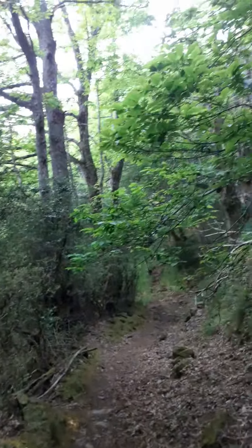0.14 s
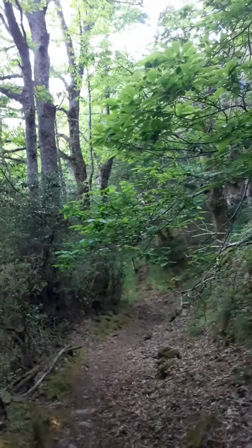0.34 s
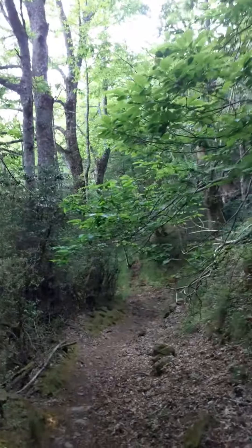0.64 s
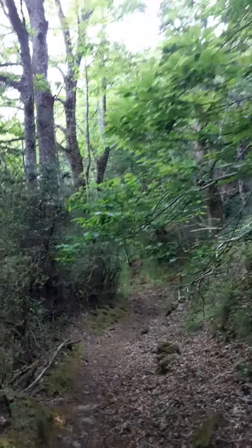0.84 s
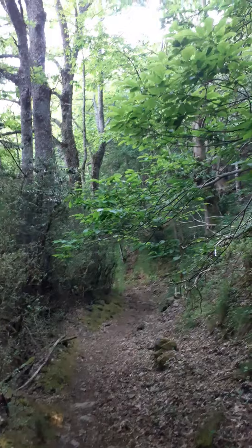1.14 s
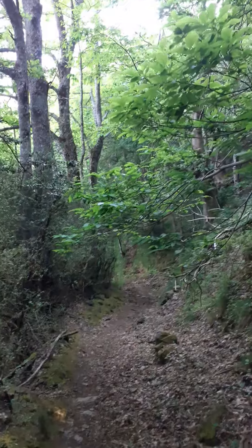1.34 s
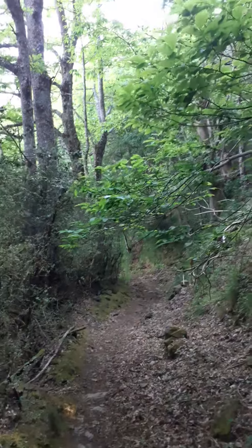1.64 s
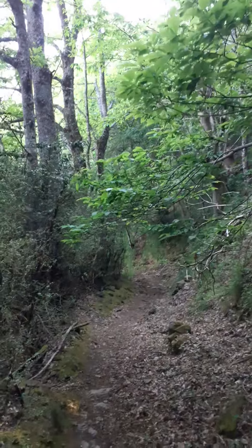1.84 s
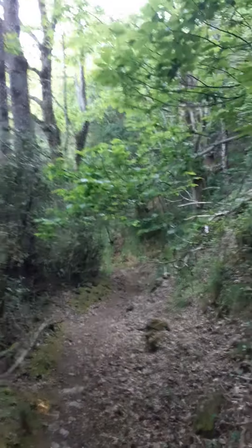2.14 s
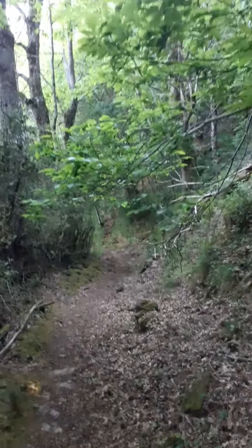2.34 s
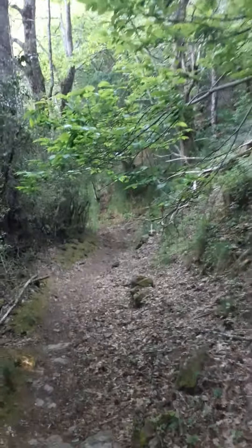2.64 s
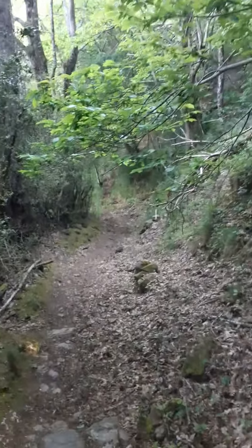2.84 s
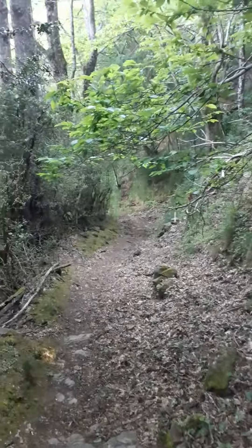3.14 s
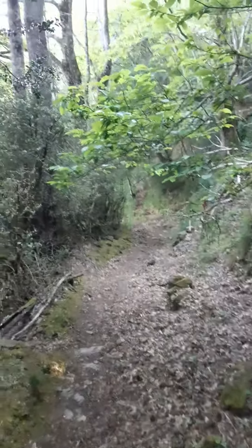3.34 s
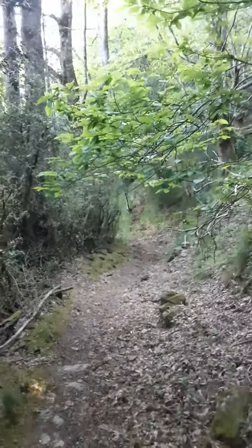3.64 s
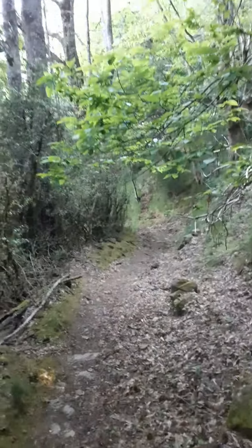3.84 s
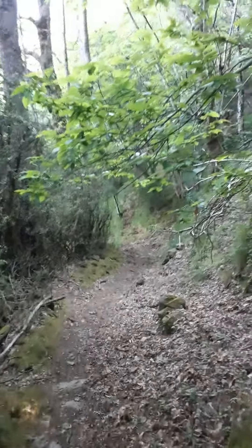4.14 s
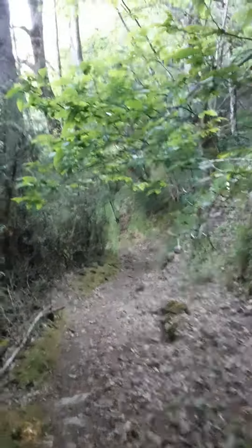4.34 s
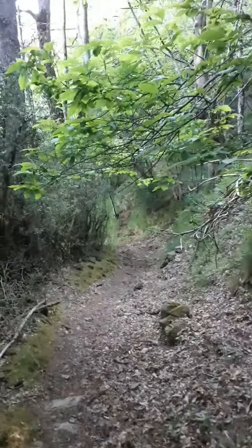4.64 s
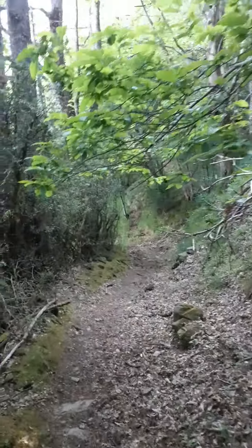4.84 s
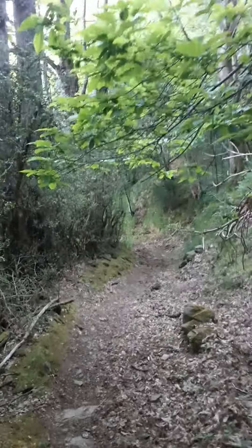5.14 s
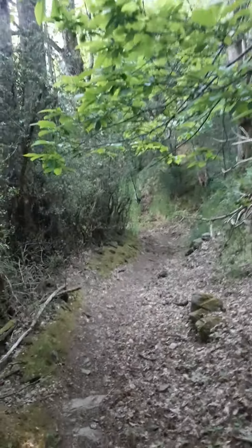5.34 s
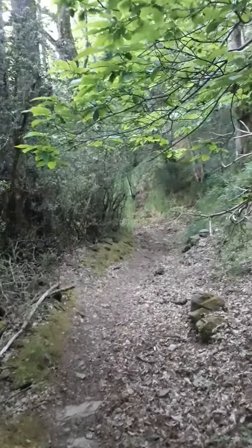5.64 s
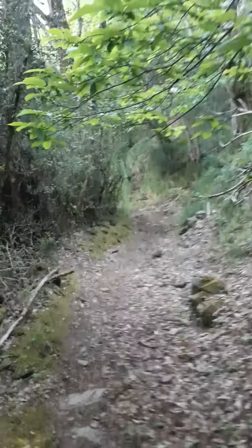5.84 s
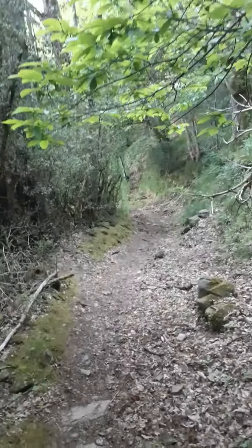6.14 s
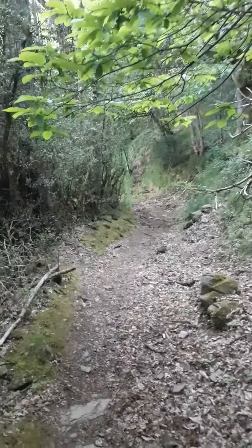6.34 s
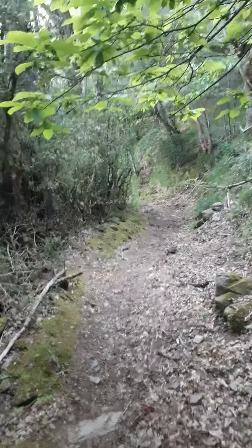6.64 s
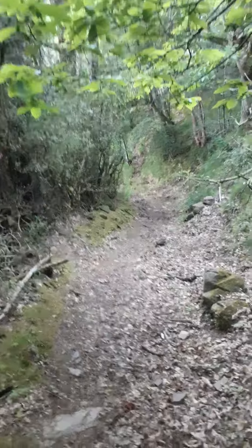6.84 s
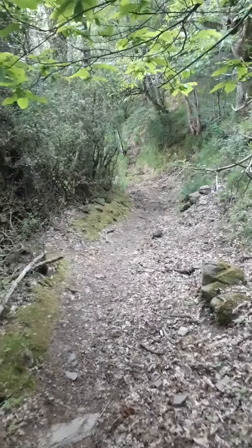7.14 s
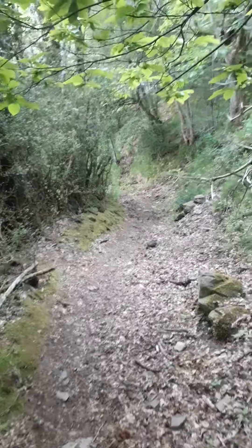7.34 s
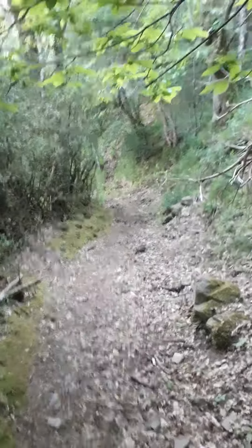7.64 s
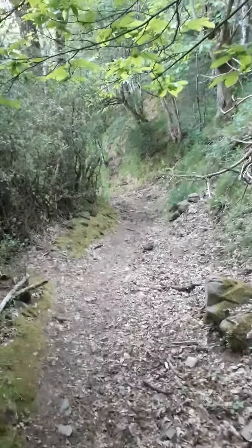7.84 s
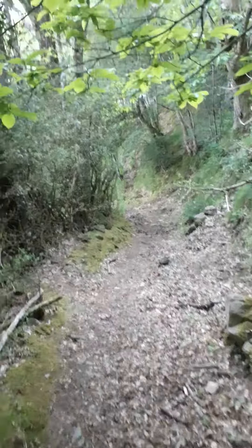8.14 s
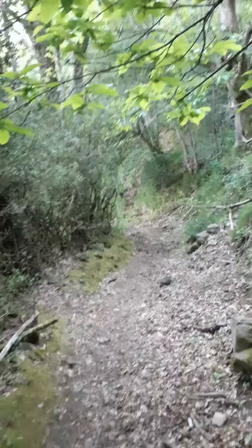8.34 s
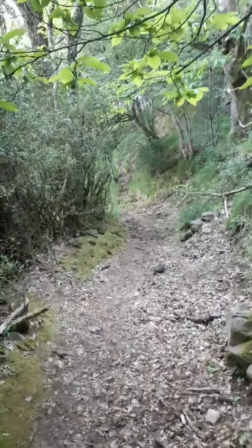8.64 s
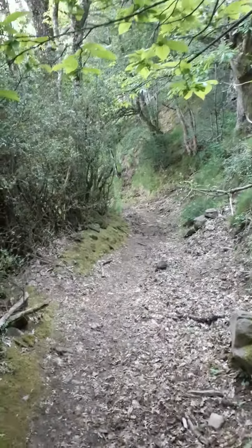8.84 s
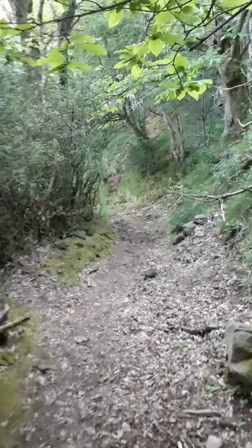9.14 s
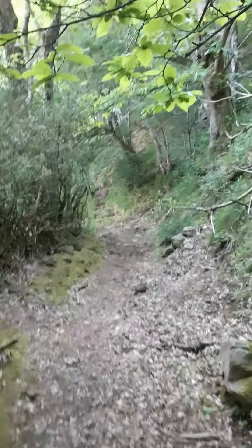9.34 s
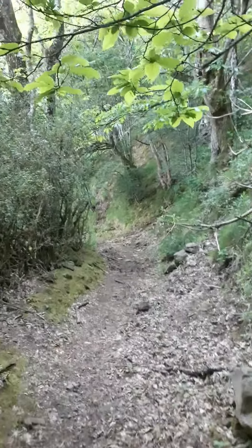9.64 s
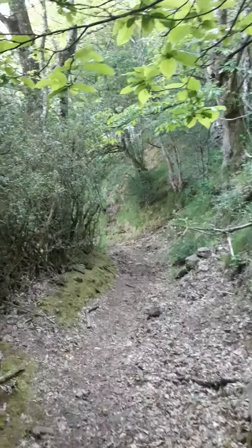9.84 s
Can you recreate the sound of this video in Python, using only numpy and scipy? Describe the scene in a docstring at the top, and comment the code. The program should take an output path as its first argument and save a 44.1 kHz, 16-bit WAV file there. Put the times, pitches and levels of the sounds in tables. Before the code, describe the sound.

Many small songbirds trill and chatter from the start, high and bright, in overlapping bursts with tiny gaps, blurred by woodland echoes. Slow, soft steps crunch dry leaf litter below. Handling knocks and plastic ticks cluster sharply around three and a half seconds, with twig snaps. Later come a few dull thumps and one near bird's quick run of rising whistles. Handheld stereo, louder on the right.

```python
"""Litter crunches, leaves hiss and a hand rumbles on a camera case as someone walks a woodland path.
Small songbirds trill all round from the start over a blur of far song: swept tones form high buzzes, V-shaped
notes and rattles of short chips, smeared by echoes off trunks and leaves. The case soon ticks and knocks, its
short modes rung by contacts; then twigs snap as filtered bursts, faint far whistles glide, and a near bird
whistles upward. Two microphone ports hear it all, the left one more shaded."""
import sys
import numpy as np
from scipy import signal
from scipy.io import wavfile

SR = 44100
rng = np.random.default_rng(int(sys.argv[2]) if len(sys.argv) > 2 else 0)


def dump_mix(stems):
    """Bounce the given channels to the path in sys.argv[1] as a 16-bit WAV at rate SR."""
    frames = np.atleast_2d(stems).T  # one column per channel
    limited = np.clip(frames, -1, 1)  # hard clip at full scale
    pcm = np.round(limited * 32767).astype(np.int16)
    wavfile.write(sys.argv[1], SR, pcm)


def volts_from_db(level):
    """Convert decibel levels to linear amplitude ratios."""
    exponent = np.asarray(level, float) / 20
    return 10 ** exponent


N = 440118

# Footsteps. Each row: moment of most force in seconds, then levels in dB of litter crunch, hand rumble, leaf hiss.
STEPS = [(0.0, -51.5, -58.5, -65), (.8, -56.5, -93, -70), (1.95, -54, -61.5, -60.5), (2.6, -60, -68, -73),
         (3.0, -58.5, -71, -69), (3.417, -48.5, -52.5, -62), (3.58, -55, -59.5, -60.5),
         (4.123, -51, -55.5, -62.5), (4.55, -56.5, -63, -77), (5.03, -51, -59, -62), (5.4, -58.5, -74, -68),
         (6.0, -55, -58, -65.5), (6.82, -54.5, -63, -65), (7.65, -55, -59.5, -62), (8.53, -55, -65.5, -66),
         (9.45, -60, -70, -65), (9.98, -60.5, -82, -66)]
# Floor between steps. One row: levels in dB of crunch, rumble, hiss.
BETWEEN_STEPS_DB = [-66, -69, -75.5]
STEP_RISE_DB_PER_S, STEP_FALL_DB_PER_S = 56.5, 49.5
# Colour of the litter, the hand on the case, the dry leaves and the far song.
# Each row: frequency in Hz, relative density in dB per Hz.
CRUNCH = [(400, -10.5), (700, -6), (1300, -8.5), (1650, -2.5), (2050, -6), (2700, -7.5), (3400, -11),
          (6000, -13.5), (9000, -6)]
RUMBLE = [(15, -51), (25, -32), (93, -3.5), (171, -11), (325, 0), (461, -9.5), (700, -15.5), (910, -62),
          (1540, -120)]
LEAVES = [(10000, -24), (11400, -7), (13300, -0.5), (15900, -5)]
FAR_CHORUS = [(3600, -34), (5200, -28), (7400, -28), (8600, -26), (9500, -30)]
FAR_CHORUS_DB = -70.5
# Shading of the left port in the textures. Each row: frequency in Hz, left over right in dB.
SHADE = [(60, -8), (500, -3), (1300, -13), (4400, -10), (8000, -3.5), (13000, -2.5)]
# How alike the ports hear the textures. Each row: frequency in Hz, likeness from 0 to 1.
LIKENESS = [(60, 0.29), (300, 0.96), (900, 0.034), (2200, 0.073), (6000, 0.035), (13000, 0.17)]
GROUND_LAG = 20   # samples the left port hears the ground late

# V-shaped song notes. Each row: middle in seconds, level in dB before the note's shape, lowest pitch in Hz.
DIPS = [(0.002, -44, 6810.0), (0.4984, -56, 4670), (0.5123, -43.5, 5380), (0.5961, -41.5, 5650),
        (0.6455, -46, 5590), (0.7827, -39, 4860), (0.8216, -45, 4500), (0.867, -44.5, 4480),
        (1.0187, -46, 4370), (1.0556, -49, 6100), (1.0835, -45, 5870), (1.1155, -39, 5000.0),
        (1.1279, -43.5, 4830), (1.4547, -52, 5600), (1.4547, -42, 4710), (1.542, -42.5, 5600),
        (1.5879, -46, 5300), (1.765, -54, 4550), (1.7939, -47.6, 4700), (1.8064, -43, 4500),
        (1.8179, -40.5, 4900), (1.8363, -46, 4990), (1.8468, -44, 5630), (1.8563, -46, 5540),
        (1.8947, -50, 5820), (1.9506, -55.0, 5580), (2.207, -46.5, 4640), (2.2234, -45, 4550),
        (2.2504, -50, 4480), (2.5552, -57, 6370), (2.5552, -44, 5340), (2.5831, -43, 5600),
        (2.6151, -43, 4960), (2.6275, -45.5, 4870), (2.6654, -57, 5900), (2.8021, -49, 4450),
        (2.8775, -47, 4820), (3.1543, -43, 5320), (3.3928, -52, 5900), (3.4242, -57, 6660),
        (3.4556, -55, 5800), (3.5699, -65, 4830), (3.5983, -54, 5780.0), (3.5988, -46, 4460),
        (3.6213, -45.5, 4400), (3.6732, -42.5, 4850), (3.6836, -46, 5800), (3.7879, -46, 4530),
        (3.8004, -45, 4760), (3.8333, -45.5, 4680), (3.9106, -67, 6900), (3.9919, -37, 5200),
        (4.0378, -40, 5380), (4.0618, -47, 4820), (4.1301, -52, 5370), (4.177, -41.5, 4600),
        (4.3197, -54.5, 4540), (4.4314, -39, 4700), (4.4489, -43.5, 5000.0), (4.4778, -45, 4460),
        (4.5681, -53, 6420), (4.7188, -63, 6120.0), (4.7776, -58.5, 4700), (4.854, -43.5, 6100),
        (4.8834, -49, 4630), (4.8964, -43.5, 5000.0), (5.044, -43, 6120.0), (5.077, -42.5, 5000.0),
        (5.0894, -42.5, 5150), (5.1518, -45, 5420), (5.3399, -45, 4870), (5.3533, -47.5, 4530),
        (5.4192, -53, 5660), (5.4356, -51, 4400), (5.4356, -40, 5450), (5.4666, -44, 4530),
        (5.8722, -49, 5770), (5.8991, -44, 6100), (5.9859, -51, 4900), (6.0098, -44.8, 6220),
        (6.0443, -50, 4550), (6.0702, -50, 4270), (6.0772, -39.5, 6000), (6.1076, -45, 4850),
        (6.2882, -51, 4890), (6.4668, -48, 6240), (6.5985, -52.5, 4740), (6.6569, -52, 6300),
        (6.6863, -57, 4600), (6.7197, -40, 6540), (6.7507, -40.5, 4650), (6.7631, -42, 5000.0),
        (7.0171, -57, 4420), (7.03, -46.5, 4520), (7.057, -53, 4300), (7.0639, -48, 4200),
        (7.6292, -47, 4770), (7.642, -45, 4940), (7.6636, -47, 6200), (7.7249, -46, 4680),
        (7.7683, -51, 6980.0), (7.7783, -56, 4350), (7.8008, -42.5, 4540), (7.8023, -40, 5930),
        (7.8127, -42, 4980), (8.2677, -52.5, 4830), (8.349, -49, 6300), (8.3775, -36, 5550),
        (8.4234, -39.5, 5000.0), (8.58, -43, 5000), (8.593, -42, 5100), (8.6264, -44.5, 4480),
        (8.6359, -55, 5100), (8.7227, -57, 5500), (8.8529, -44, 6520), (8.9078, -40.5, 6000),
        (8.9242, -41, 5050), (9.3842, -42, 5320), (9.4126, -52, 6150), (9.4126, -41, 5370),
        (9.5159, -47, 5900), (9.5433, -44, 5600), (9.5822, -46, 5760), (9.5822, -44, 5000.0),
        (9.6122, -50, 5900), (9.6356, -45, 4430), (9.658, -44.5, 4500), (9.6855, -45.5, 4680),
        (9.887, -52, 5970), (9.9, -49, 5760), (9.9509, -66, 4450)]
DIP_MS, DIP_HZ_PER_MS, DIP_EDGE_DB, DIP_GAIN_DB = 11, 553.5, -11.5, 6
# High buzzing notes. Each row: middle in seconds, level in dB before the note's shape, middle pitch in Hz.
HIGH_NOTES = [(0.0095, -42, 7170), (0.0195, -55, 8350), (0.0239, -38.5, 7270), (0.0374, -44, 8200),
              (0.0469, -39, 7180), (0.0708, -42.1, 7950), (0.0953, -52.7, 7200), (0.1147, -53, 7980.0),
              (0.1292, -41, 8020), (0.1412, -54.5, 9100), (0.1522, -41, 7660), (0.1646, -58, 9300),
              (0.1736, -39, 7780), (0.1861, -55, 6500), (0.1881, -44, 7320), (0.1961, -57, 8930.0),
              (0.2025, -50, 7760), (0.3886, -47.5, 7250), (0.4011, -46, 7200.0), (0.4086, -48, 8360),
              (0.4126, -42, 7130), (0.429, -41, 7420), (0.442, -42, 7200.0), (0.4535, -43, 6900),
              (0.4719, -45, 6900), (0.4939, -43, 7370), (0.5039, -60, 9200), (0.5098, -40, 7730),
              (0.5198, -58, 9050), (0.5293, -38.5, 7840), (0.5398, -57, 8930.0), (0.5473, -39, 7340),
              (0.5697, -41, 7100), (0.6106, -47, 6690.0), (0.6595, -50, 8060), (0.6844, -45, 7770),
              (0.7059, -50, 7980.0), (0.7234, -44, 6940.0), (0.7353, -43, 7290.0), (0.7403, -48, 7950),
              (0.7558, -46, 8170), (0.7688, -48.8, 8200), (0.7802, -42.5, 8100), (0.7952, -39, 7800),
              (0.8176, -37.5, 7440), (0.8331, -57, 8750.0), (0.8451, -55, 7290.0), (0.8685, -40.5, 7280),
              (0.8865, -49, 7340), (0.9334, -55.8, 7500), (0.9454, -60, 7300), (1.0621, -58, 6900),
              (1.0681, -51, 7730), (1.0721, -55, 6600.0), (1.0965, -50, 7900), (1.0995, -47, 6600.0),
              (1.1728, -45, 6500), (1.2177, -47.5, 6770), (1.3714, -54, 7900), (1.3854, -53, 8100),
              (1.3978, -54, 7900), (1.4103, -44, 7720), (1.4113, -39, 6720), (1.4228, -53, 7890.0),
              (1.4238, -44, 6770.0), (1.4437, -54, 6770.0), (1.4836, -50, 7760), (1.4986, -39.5, 7580),
              (1.5101, -40, 7500), (1.5225, -59.1, 9100.0), (1.526, -39.5, 7730), (1.5555, -41, 6800),
              (1.6817, -50, 7340), (1.6887, -56, 7940), (1.6932, -41, 7100), (1.6981, -58, 9150),
              (1.7001, -45, 7860), (1.7156, -46, 7810.0), (1.7261, -63, 9100), (1.7395, -43, 7900),
              (1.749, -41, 8000), (1.7505, -34.5, 7230), (1.7655, -31.5, 7620), (1.7924, -36.5, 7350),
              (1.8034, -42, 7250), (1.8124, -54, 9000), (1.8313, -54, 7890.0), (2.1411, -52, 7900),
              (2.1631, -52, 8100), (2.1746, -45, 7530), (2.1935, -49, 7200), (2.3352, -56, 7200.0),
              (2.5163, -57, 7650), (2.6031, -44.5, 7250), (2.6285, -49, 7400), (2.7218, -54, 7460),
              (2.7343, -61, 8100), (2.7478, -51, 7550), (2.7617, -54, 7890.0), (2.7752, -45, 7120.0),
              (2.7822, -53, 7800), (2.7981, -46, 7400), (2.8111, -46, 7100), (2.9438, -54, 7000),
              (2.9608, -51, 7450), (2.9832, -53, 7400), (2.9987, -57, 7300), (3.0161, -60, 7450),
              (3.0985, -50, 7980.0), (3.102, -46.5, 6670), (3.1144, -45, 7520), (3.1284, -48, 7000),
              (3.1389, -43, 7500), (3.1553, -47, 7300), (3.2277, -52, 7630.0), (3.2416, -50, 7300),
              (3.2546, -49, 7000), (3.2661, -47, 7530), (3.291, -53, 8500), (3.3025, -47, 8060),
              (3.3274, -50.1, 7200), (3.3384, -49, 7980.0), (3.3828, -63, 7030.0), (3.54, -45, 6770.0),
              (3.5415, -42, 7800), (3.5439, -48, 8700), (3.5554, -60, 7640), (3.5679, -51, 7400),
              (3.5799, -40, 7810.0), (3.6218, -46, 9180.0), (3.6258, -43, 7100), (3.6263, -43, 8000),
              (3.6422, -53, 7500), (3.6582, -49, 7500), (3.7051, -47, 7700), (3.7076, -51, 8570),
              (3.729, -55, 7810.0), (3.743, -45.5, 7200.0), (3.7545, -49, 7200.0), (3.8757, -46, 7830),
              (3.8802, -58, 9100.0), (3.8907, -43, 7200), (3.8996, -39, 7440), (3.9231, -36.5, 7120.0),
              (3.9356, -35.5, 7180), (3.949, -62, 8100), (3.9525, -38, 7130), (4.0423, -55, 8300),
              (4.0747, -42, 6860.0), (4.1301, -54, 7900), (4.1536, -61, 8200), (4.1785, -51.7, 7900),
              (4.198, -55, 8000), (4.2299, -52, 7240), (4.2653, -51, 6600), (4.3895, -50, 7630),
              (4.4045, -44.3, 7400), (4.4205, -48, 6770.0), (4.5083, -53, 8240.0), (4.5287, -54.5, 7530),
              (4.5417, -54, 7800), (4.5546, -53, 7500), (4.7322, -55.1, 7660), (4.7592, -56.5, 7800),
              (4.8225, -60, 8160), (4.825, -51, 6800), (4.8425, -42, 7730), (4.8689, -47, 7560),
              (5.0131, -54.7, 8100), (5.0166, -38.5, 6780), (5.0256, -48, 8400), (5.1044, -44, 7810.0),
              (5.1049, -56, 8800), (5.1169, -47, 8200), (5.1403, -49, 8140), (5.1608, -54.4, 8270),
              (5.1668, -49, 7200.0), (5.259, -59, 8000), (5.2775, -54, 7760), (5.2865, -55.3, 7960),
              (5.301, -55, 8000), (5.3124, -47, 7200), (5.3269, -48.4, 7440), (5.3394, -54.8, 7600),
              (5.3678, -53, 7540), (5.4317, -52, 7900), (5.4521, -44, 7800), (5.479, -44, 7430),
              (5.8502, -57, 7200.0), (5.8712, -60, 8100), (5.8881, -42, 7600), (5.9131, -41, 7500),
              (5.9595, -45.5, 8000), (5.9709, -51, 7720.0), (5.9834, -46, 7460.0), (6.0004, -47.4, 7800),
              (6.0193, -43, 6800), (6.0288, -43, 7670), (6.0398, -39, 7550.0), (6.0502, -38, 7000),
              (6.0562, -63, 9100.0), (6.0612, -33.5, 7830), (6.0937, -37, 7360), (6.1151, -53, 7630.0),
              (6.4449, -48.5, 7400), (6.6693, -44, 7920), (6.6718, -52, 8970), (6.6838, -39, 7950),
              (6.6968, -53, 8900), (6.7088, -40, 7680), (6.7312, -36, 7520), (6.7776, -44, 7380),
              (6.9537, -54, 7950), (6.9717, -52, 7650), (6.9831, -46, 7800), (7.0001, -48, 7740),
              (7.1233, -51, 7600), (7.1393, -60, 8950), (7.1478, -43, 7730), (7.1652, -70, 8900),
              (7.1687, -41, 7900), (7.1807, -49, 7570), (7.1946, -42, 7810.0), (7.1986, -59, 8500),
              (7.2121, -43, 7200.0), (7.4665, -64, 6600), (7.482, -63, 6530), (7.5513, -47, 7650),
              (7.5673, -39.5, 8100), (7.5753, -47, 9270), (7.5833, -41, 7600), (7.5957, -41.5, 8230),
              (7.6012, -59, 9500), (7.6022, -47, 6700), (7.6152, -40, 7430), (7.6371, -48, 7600),
              (7.6511, -50, 7840), (7.7185, -48, 7890.0), (7.72, -53, 9060), (7.7309, -46, 8060.0),
              (7.7469, -42, 7200), (7.7579, -37.5, 7650), (7.7798, -39, 7450), (7.8132, -48, 7600),
              (7.8896, -54, 7400), (8.1535, -50.5, 7860), (8.1654, -49, 8570), (8.1814, -46, 7800),
              (8.1844, -56, 6940), (8.1999, -46, 7740), (8.2143, -45, 7000), (8.2263, -54.4, 7550.0),
              (8.3121, -44.5, 7460.0), (8.3236, -42, 7500), (8.3291, -56, 8940), (8.3356, -40, 7760),
              (8.364, -33.5, 7500), (8.3924, -46, 7380.0), (8.4204, -46, 7600), (8.5201, -48, 8100),
              (8.5416, -45, 7670), (8.5566, -55, 8800), (8.5645, -48, 7380.0), (8.579, -44, 7980.0),
              (8.5905, -44, 7950), (8.602, -41, 7560), (8.6174, -47, 7890.0), (8.7312, -58, 7600),
              (8.8444, -53, 7640), (8.8619, -49, 6900), (8.8713, -41, 7800), (8.8828, -44, 7600),
              (8.8843, -41.5, 6650), (8.8943, -39, 7550.0), (8.9202, -38.5, 7750), (8.9337, -46, 7630.0),
              (8.9532, -51.8, 6770.0), (8.9546, -45, 8000), (8.9676, -40, 7250), (8.9861, -44, 6740),
              (8.9881, -60, 7950), (9.3732, -49, 7450), (9.3832, -46, 7500), (9.3902, -51, 8040),
              (9.4021, -47, 7600), (9.4226, -43, 7720.0), (9.4246, -52, 6640), (9.4341, -41, 7330),
              (9.455, -54, 7340), (9.5303, -36, 7580), (9.5608, -34.5, 7400), (9.5872, -44, 7760),
              (9.6251, -47, 7200.0), (9.9145, -44, 7380.0), (9.9319, -46, 7400), (9.9454, -42, 7360),
              (9.9569, -39.5, 7140), (9.9649, -52, 8540)]
HIGH_MS, HIGH_SAG_HZ_PER_MS, HIGH_ENTRY_HZ, HIGH_EDGE_DB, HIGH_GAIN_DB = 13, 46.2, 1200, -6.5, 2
# Arched chips of the rattle. Each row: middle in seconds, level in dB before the note's shape, crest pitch in Hz.
CHIPS = [(0.0748, -52, 7070.0), (0.1477, -54, 7200), (0.1666, -59, 7200), (0.5173, -63, 5950),
         (0.5493, -45, 6600), (0.5527, -57, 6200), (0.5582, -48, 6260), (0.5922, -54, 6480),
         (0.6001, -51, 5340), (0.6001, -56, 6080), (0.6385, -47, 6560), (0.6495, -49, 6280),
         (0.6909, -42.5, 6590), (0.6969, -53.2, 6200), (0.7403, -46, 6320), (0.7453, -61, 6600),
         (0.7737, -60, 5200), (0.7742, -46, 6430), (0.8141, -46, 5900), (0.8576, -50, 6060),
         (0.867, -46, 6400), (0.9314, -43, 5700), (0.9354, -63, 5900), (0.9449, -64, 5650),
         (0.9708, -43.5, 6100), (0.9743, -54, 6600), (1.12, -52, 5840), (1.1319, -53.5, 6150),
         (1.1604, -45, 6680), (1.2033, -45, 5700), (1.2033, -52, 6230), (1.2078, -57, 6460),
         (1.2472, -43.5, 6240), (1.2507, -48, 5700), (1.2921, -46.5, 5660), (1.339, -46, 5780),
         (1.3439, -59, 5850), (1.4402, -58, 5000), (1.4472, -49, 5750), (1.4841, -42, 6330),
         (1.4881, -57, 6250), (1.5215, -44, 5610), (1.561, -42, 5570), (1.6193, -48.5, 6500),
         (1.6622, -50, 6100), (1.7066, -47.5, 6470), (1.748, -48, 6300), (1.753, -51, 6060),
         (1.7735, -42, 6400), (1.778, -41.5, 6650), (1.8418, -43, 6070), (1.8523, -39.5, 6220),
         (1.8907, -44.5, 6140), (1.8992, -40.5, 6010), (1.9062, -54, 6070), (1.9296, -48, 5480),
         (1.9461, -44, 5980), (1.9705, -48, 5850), (2.2115, -53, 5500), (2.2544, -53, 5550),
         (2.2808, -51.9, 5780), (2.3237, -47.5, 5740), (2.3681, -48.5, 5460), (2.5592, -63, 6240),
         (2.618, -56, 5200), (2.662, -43.5, 6360), (2.7073, -43.5, 5940), (2.7128, -51, 6500),
         (2.7547, -43.5, 5900), (2.7587, -59, 5760), (2.8126, -46, 5720), (2.8176, -49, 5680),
         (2.839, -47.5, 6820), (2.9124, -50, 6100), (2.9159, -54, 6360), (2.9513, -51, 6020),
         (2.9927, -52, 5500), (3.1588, -65, 6360), (3.1967, -45.5, 5840), (3.1967, -46, 6710),
         (3.2361, -45, 5620), (3.2406, -61, 5900), (3.2795, -51, 5570), (3.3649, -50, 5970),
         (3.3823, -59, 5150), (3.3943, -48, 5340), (3.4068, -51, 7000), (3.4222, -51, 5000.0),
         (3.4611, -58, 7050), (3.4736, -59, 6800), (3.539, -49, 5580), (3.5694, -42.5, 6600),
         (3.6033, -41, 5390), (3.6412, -43.5, 6100), (3.6632, -46, 5250), (3.6766, -57, 5300),
         (3.6796, -43, 5940), (3.7091, -54, 6940), (3.7176, -47, 5000.0), (3.7176, -42.5, 5790),
         (3.718, -45.5, 7070.0), (3.754, -45, 5290), (3.754, -44, 6160), (3.7949, -47, 5610),
         (3.8258, -44.5, 5620), (3.8672, -42, 5880), (3.8707, -50, 5470), (3.8707, -58, 6460),
         (3.9051, -41, 5380), (3.9086, -50, 5500), (3.953, -42, 5600), (3.9565, -54, 5700),
         (3.976, -64, 5700), (3.9839, -40, 7100), (4.0353, -40, 7120), (4.0802, -38, 6600),
         (4.0842, -42, 6250), (4.0887, -40, 5580), (4.1027, -54, 5100), (4.1221, -52.9, 6020),
         (4.1261, -37, 6140), (4.1341, -57, 6350), (4.1755, -52, 6140), (4.1775, -44, 5630),
         (4.2169, -43, 5790), (4.2199, -63, 6050), (4.401, -59, 6800), (4.4344, -65, 5100),
         (4.4678, -48, 6550), (4.5137, -43.5, 5840), (4.5172, -50, 5380), (4.5532, -43, 5550),
         (4.5561, -53, 5550), (4.6, -47, 6440), (4.6, -43, 5660), (4.6055, -62, 6900), (4.6424, -59, 6650),
         (4.6849, -58, 6060), (4.8575, -48, 6980), (4.8864, -51, 5170), (4.9223, -54, 5570),
         (4.9273, -47.5, 5450), (4.9627, -51, 5700), (5.0036, -48.5, 6070), (5.0455, -46.5, 5820),
         (5.0485, -50.7, 6900), (5.0495, -62, 5200), (5.0949, -43, 6060), (5.1273, -47, 7000),
         (5.1453, -49, 5000.0), (5.1752, -43.5, 6780), (5.2042, -48, 6980), (5.2511, -50, 5950),
         (5.3079, -54, 5600.0), (5.3429, -62, 5090.0), (5.3788, -47.5, 6830), (5.4157, -50, 6210.0),
         (5.4401, -62, 5840), (5.4551, -55, 6100), (5.4671, -40.5, 7160), (5.497, -46, 6660),
         (5.509, -45, 6200), (5.5394, -45.5, 5300), (5.5394, -55, 6160), (5.5808, -48.5, 5740),
         (5.5848, -86, 5600), (5.6257, -50, 5460), (5.6297, -54, 5350), (5.6851, -51.5, 5000.0),
         (5.8791, -66, 7260), (5.9295, -59, 6300), (5.935, -46.5, 6400), (5.946, -47, 6090),
         (5.9894, -48.5, 5390), (6.0203, -52, 5800), (6.0308, -61, 5330), (6.0308, -43, 6040),
         (6.0353, -48, 5500), (6.0807, -39, 7120), (6.0812, -45, 5450), (6.1111, -43, 5620),
         (6.1186, -37, 6330), (6.1231, -43, 6080), (6.154, -44, 6500), (6.1964, -41, 5790),
         (6.2004, -55, 5580), (6.2398, -43, 5740), (6.2847, -45.5, 5960), (6.3361, -49.5, 5540),
         (6.4708, -67, 7000), (6.5112, -54, 6440), (6.5481, -54, 6520), (6.594, -59, 5770),
         (6.6439, -56, 5440), (6.6609, -54, 7100), (6.7222, -49, 6970), (6.7332, -53, 5950.0),
         (6.7541, -47.5, 5500), (6.7926, -42, 7150), (6.7976, -43, 5740), (6.8315, -41, 5490),
         (6.8315, -49, 6600), (6.8734, -43, 6000), (6.8769, -52, 6900), (6.9876, -52, 6420),
         (7.0205, -51.5, 5000.0), (7.1004, -52.5, 5950), (7.1433, -49, 5520), (7.5444, -56, 6800),
         (7.6327, -52, 6000), (7.6671, -47, 6110), (7.6671, -43.5, 7030), (7.704, -45, 6450),
         (7.7419, -47, 6000), (7.7459, -56, 6000), (7.7783, -43.5, 6760), (7.7863, -43, 6420),
         (7.8292, -48, 5400), (7.8342, -45, 5500), (7.8442, -39.5, 6660), (7.8876, -44, 5230),
         (7.8876, -41.5, 6160), (7.9584, -46, 5520), (8.3156, -50, 6140), (8.352, -44, 7040),
         (8.3815, -48, 6500), (8.4079, -54, 5200), (8.4159, -49, 5070), (8.4613, -43, 6100),
         (8.4648, -56, 6600), (8.5037, -44, 5630), (8.5072, -51, 6870), (8.5486, -44.5, 5590),
         (8.5985, -46, 5000.0), (8.6024, -46, 5260), (8.6314, -44, 5680), (8.6434, -43.6, 7000),
         (8.6658, -43, 5560), (8.6793, -46.5, 5670), (8.6793, -48, 6920), (8.7102, -57, 5200),
         (8.7182, -43.5, 5400), (8.7182, -49, 6540), (8.7726, -49.5, 5800), (8.8185, -55.5, 5060),
         (8.8559, -56, 7000), (8.9127, -50, 5660), (8.9127, -48, 6280), (8.9192, -54, 5700),
         (8.9437, -45, 7000), (8.9611, -45, 5670), (8.9656, -39.5, 6150), (8.9761, -45, 6600),
         (8.9821, -54, 5950), (9.0045, -44.5, 5180), (9.0155, -44, 6340), (9.018, -55, 6570),
         (9.0554, -65, 6540), (9.0619, -47, 6240), (9.0948, -47.8, 6060), (9.1392, -51.5, 5930),
         (9.3762, -56, 6400), (9.3797, -63, 5830), (9.4186, -58, 5830), (9.442, -49, 5830),
         (9.452, -47, 5080), (9.4525, -49, 6640.0), (9.4859, -49, 5030), (9.4859, -51, 6280),
         (9.5263, -46.5, 5550), (9.5463, -50.4, 5870), (9.5693, -45.5, 5100), (9.5698, -41, 6500),
         (9.6176, -45, 6580), (9.6181, -42.5, 5200), (9.6491, -50, 6470), (9.6785, -49, 5420),
         (9.6975, -46, 5710), (9.7279, -44.5, 6230), (9.7778, -49, 5000.0), (9.7778, -47, 6150),
         (9.894, -63, 6450), (9.9579, -53, 6000), (9.9673, -52, 5600), (9.9763, -47, 6900)]
CHIP_MS, CHIP_FALL_HZ, CHIP_POINT = 7.6, 4297, 1.6   # the fall follows this power of time
CHIP_EDGE_DB, CHIP_GAIN_DB = -17, 8.5
THROAT_LOW_HZ, LOW_LOSS_DB_PER_KHZ = 4400, 6   # the voice weakens for a kilohertz below this
PERCH_CHANGE_S = .35   # another perch takes the lead this often
# Directions of the perches. One row: samples the left port hears each perch early.
PERCH_LEADS = [12, 6, 17, 10]

# Sharp ticks of the case. Each row: start in seconds, relative level in dB, left over right in dB.
TICKS = [(0.538, -45, -19), (0.889, -48, -13), (1.831, -45, -11), (2.018, -48, -19.5), (2.4986, -50, -11),
         (3.3712, -37, -7), (3.394, -47, -5), (3.412, -41, -4), (3.421, -45, -5), (3.5267, -28, -8),
         (3.587, -38.5, -3), (3.609, -24, -9), (4.073, -50, 6), (4.393, -55, 2), (4.479, -51, -11),
         (4.958, -52, -8), (7.512, -52, -10), (7.844, -48, -2), (7.887, -45, -9), (9.7854, -54, -18)]
# Plastic modes in each tick. Each row: frequency in Hz, relative level in dB, 60 dB decay time in seconds.
TICK_MODES = [(1820, -25, 0.0037), (2850, -8, 0.015), (4020, -8, 0.0025), (5000, 0.5, 0.005),
              (7200, 11, 0.0043), (8950, 9, 0.0016), (11800, 10.5, 0.0014), (14600, -8.5, 0.036)]
# Dull knocks on the case. Each row: start in seconds, relative level in dB, ring in Hz,
# relative brightness in dB, left over right in dB.
KNOCKS = [(0.658, -58, 111, -30, -20), (0.801, -51, 377, -21, -6), (1.739, -48, 258, -21, -30),
          (1.807, -55, 101, -23, -21), (2.239, -48.5, 281, -5.5, -6), (2.492, -51, 346, 5, -8),
          (2.568, -42.5, 277, -18, -5), (3.359, -46, 105, -35, -15), (3.37, -32.5, 354, -8, -5),
          (3.385, -54, 360, -3, -9), (3.408, -51, 410, -5, 4), (3.448, -44, 111, -35, -30),
          (3.454, -59, 314, -24, -19), (3.53, -40.5, 347, -12, -14), (3.557, -48, 92, -35, -26),
          (3.562, -44, 323, -32, -30), (3.688, -46.5, 338, -5, -12), (4.075, -51, 106, -35, -4),
          (4.08, -33.5, 334, -32, -1.5), (4.118, -56, 335, -20, 3), (4.55, -47, 366, -11, -8),
          (4.709, -56, 110, -45, -25), (4.905, -45, 374, -17, -6), (4.949, -42, 360, -19, -5),
          (5.944, -40, 275, -12, -2), (6.029, -48, 109, -21, -24), (6.483, -54.5, 297, 1, -13),
          (6.5232, -32, 310, -36, -5), (6.636, -47.5, 126, -9, -8), (7.396, -48, 320, -30, -4),
          (7.5, -53, 347, -25.5, -8), (7.6377, -30, 368, -2, -11), (8.207, -53.5, 256, -45, -13),
          (8.314, -56, 347, 2, -10), (9.235, -54, 330, -36, -2)]
# Twig snaps. Each row: start in seconds, relative level in dB, resonance in Hz.
TWIGS = [(1.8505, -38.5, 2320), (1.923, -42, 2300), (1.964, -55, 2000), (2.047, -58, 2070),
         (2.9856, -44, 1520), (3.3178, -43, 1580), (3.3486, -42, 1730), (3.395, -43, 2660),
         (3.3835, -34, 2800), (3.4193, -31.5, 2380), (3.427, -52, 1700), (3.463, -65, 1500),
         (3.573, -61, 1300), (3.7206, -44, 1420), (3.9718, -41.5, 1630), (4.071, -37.5, 1380),
         (4.1017, -56, 1970), (4.2, -47, 990), (5.0355, -50, 2160), (6.6847, -45, 1320), (6.796, -65, 2080),
         (7.7079, -43.5, 1630), (9.3957, -45.5, 1190), (9.615, -52, 3060), (9.649, -51, 2260)]
# Far whistles. Each row: start in seconds, relative level in dB, start pitch in Hz, end pitch in Hz, length in ms.
FAR_WHISTLES = [(4.432, -61, 3520, 3200, 22), (4.722, -62, 3640, 3570, 26), (4.749, -59, 3550, 3060, 32),
                (5.119, -57, 3580, 2850, 53), (5.240, -61, 3500, 3180, 35), (9.817, -65.5, 3220, 3070, 92),
                (9.942, -60, 3220, 3240, 13)]
# Nearest bird. Each row: start in seconds, relative level in dB, start pitch in Hz, top pitch in Hz, length in ms.
WHISTLES = [(7.225, -30.5, 6950, 7540, 15), (7.267, -29.5, 6040, 7430, 34), (7.312, -27.5, 5470, 7090, 31),
            (7.357, -27.5, 5230, 6700, 26.5), (7.402, -28, 5000, 6340, 27.4)]

PORT_DIP_HZ, PORT_DIP_WIDTH_HZ, PORT_DIP_SHARE = 3323, 1500, 0.48   # the ports hear this band weakly
THIN_HZ, THIN_WIDTH_HZ, THIN_SHARE = 10220, 590, 0.15   # a narrow band near 10 kHz sounds slightly thin
TOP_HZ = 15950   # only sharp ticks reach above this


def rms_one(x):
    """Scale to unit rms."""
    return x / np.sqrt(np.mean(x ** 2) + 1e-20)


def at_hz(points, hz):
    """Read a spectrum on a log-frequency axis."""
    table_hz, values = np.array(points).T
    return np.interp(np.log(hz), np.log(table_hz), values)


def drift(rate_hz):
    """Slow random wander of unit rms: smoothed noise made at every 40th sample."""
    r = np.exp(-80 * np.pi * rate_hz / SR)
    noise = rng.standard_normal(N // 40 + 2002)
    slow = signal.lfilter([1], [1, -2 * r, r * r], noise)[2000:]   # drop the filter's run-in
    return np.interp(np.arange(N) / 40, np.arange(len(slow)), rms_one(slow))


def add(out, s, sound):
    """Mix a sound in at time s."""
    i = round(s * SR)
    out[..., i:i + sound.shape[-1]] += sound[..., :N - i]


def texture(spectrum, grain_db, patchy_db):
    """Third-octave bands of grainy stereo noise, each flickering by itself; the right channel has unit spread."""
    low_hz, high_hz = spectrum[0][0], spectrum[-1][0]
    edges = low_hz * 2 ** np.arange(0, np.log2(high_hz / low_hz) + .01, 1 / 3)
    grains = volts_from_db(grain_db * np.minimum(rng.exponential(1, N), 5))   # a few grains crack much louder
    white = rng.standard_normal((2, 2, N)) * grains
    out = 0
    for k, (low, high) in enumerate(zip(edges, edges[1:])):
        band = signal.butter(2, [low, high], "band", fs=SR, output="sos")
        shared, own = signal.sosfilt(band, white[k % 2])   # neighbouring bands use separate noise
        hz = np.sqrt(low * high)
        alike = np.clip(at_hz(LIKENESS, hz), 0, 1)
        left = alike * np.roll(shared, GROUND_LAG) + np.sqrt(1 - alike ** 2) * own
        left = volts_from_db(at_hz(SHADE, hz)) * left
        flicker = volts_from_db(at_hz(spectrum, hz) + patchy_db * drift(10.8))
        out = out + flicker * np.array([left, shared])
    return out / np.std(out[1])


def step_swell(step_s, peaks_db, rest_db):
    """Every step swells and sinks at a steady dB rate; their powers add over a resting floor."""
    t = np.arange(0, N + 99, 100) / SR
    since = t - step_s[:, None]
    shape_db = np.where(since < 0, STEP_RISE_DB_PER_S * since, -STEP_FALL_DB_PER_S * since)
    power = np.sum(volts_from_db(peaks_db[:, None] + shape_db) ** 2, axis=0) + volts_from_db(rest_db) ** 2
    return np.interp(np.arange(N) / SR, t, np.sqrt(power))


def walking():
    """With each step litter crunches, the hand rumbles on the case and dry leaves hiss."""
    step_s, *peaks_db = np.transpose(STEPS)
    crunch, rumble, hiss = (step_swell(step_s, db, rest_db) for db, rest_db in zip(peaks_db, BETWEEN_STEPS_DB))
    out = crunch * texture(CRUNCH, grain_db=4.5, patchy_db=2.8)
    out = out + rumble * texture(RUMBLE, grain_db=5.5, patchy_db=3.0)
    return out + hiss * texture(LEAVES, grain_db=3.5, patchy_db=1.5)


def far_song():
    """Distant song blurs into a flickering band of noise."""
    return volts_from_db(FAR_CHORUS_DB) * texture(FAR_CHORUS, grain_db=2.0, patchy_db=5)


def dip(hz, wide):
    """Drops to its lowest pitch and springs back: pitch in Hz and level in dB along the note."""
    u = np.linspace(-1, 1, round(DIP_MS * SR / 1000))
    path_hz = hz + wide * DIP_HZ_PER_MS * DIP_MS / 2 * (np.sqrt(u ** 2 + 0.0019) - 0.05)   # rounded V
    return path_hz, DIP_GAIN_DB + DIP_EDGE_DB * u ** 2 - 2.0 * u


def high_note(hz, wide):
    """Slides in from above, then sags slowly: pitch in Hz and level in dB along the note."""
    u = np.linspace(-1, 1, round(HIGH_MS * SR / 1000))
    sag_hz = wide * HIGH_SAG_HZ_PER_MS * u * HIGH_MS / 2
    entry_hz = HIGH_ENTRY_HZ * (np.maximum(-u - 0.4, 0) / 0.6) ** 2
    return hz - sag_hz + entry_hz, HIGH_GAIN_DB + HIGH_EDGE_DB * u ** 2


def chip(hz, wide):
    """Shoots up from far below, turns over and drops back, faint at both feet: pitch in Hz and level in dB."""
    u = np.linspace(-1, 1, round(CHIP_MS * SR / 1000))
    path_hz = np.maximum(hz - wide * CHIP_FALL_HZ * np.abs(u) ** CHIP_POINT, 1200)
    return path_hz, CHIP_GAIN_DB + CHIP_EDGE_DB * u ** 2 - 0.6 * u


def chorus():
    """Each note is a near sine swept along the shape of its kind; perches in different directions take turns."""
    out = np.zeros((len(PERCH_LEADS), N))
    for kind, (notes, shape) in enumerate([(HIGH_NOTES, high_note), (DIPS, dip), (CHIPS, chip)]):
        chance = np.tanh(rng.standard_normal((len(notes), 2)))
        for (s, level_db, hz), (wide, turn) in zip(notes, chance):
            path_hz, path_db = shape(hz, volts_from_db(0.6 * wide))   # no two sweeps quite as wide
            capped_hz = np.minimum(path_hz, 9400)   # top of the voice
            phase = 2 * np.pi * np.cumsum(capped_hz) / SR + 6 * turn
            tone = np.sin(phase) + volts_from_db(-37.5) * np.sin(2 * phase)
            weak_db = LOW_LOSS_DB_PER_KHZ * np.clip(THROAT_LOW_HZ - path_hz, 0, 1000) / 1000
            swell = volts_from_db(level_db + path_db - weak_db) * signal.windows.tukey(len(tone), .2)
            perch = (int(s / PERCH_CHANGE_S) + kind) % len(out)
            add(out[perch], max(s - len(tone) / SR / 2, 0), swell * tone)
    return out


def woodland(song, lead, early_db, tail_db):
    """Direct sound, close scatter from branches, and a diffuse tail from the trunks, different at each port."""
    t = np.arange(SR // 2) / SR
    sparse = rng.random((2, len(t))) < .03
    early = volts_from_db(early_db - 60 * t / 0.084) * sparse * 10.67 * (1 - np.exp(-t / 0.001))
    tail = volts_from_db(tail_db - 60 * t / 0.34) * (1 - np.exp(-t / 0.028))
    echoes = rng.standard_normal((2, len(t))) * (early + tail)
    echoes[0, 0], echoes[1, lead] = .85, 1   # direct sound, left port first
    return signal.fftconvolve(song[None], echoes, axes=1)[:, :N]


def shaded(birds):
    """The case shades the left port most in the middle of the song; both edges get round it better."""
    stop = signal.butter(3, [4300, 8300], "bandstop", fs=SR, output="sos")
    edges = signal.sosfilt(stop, birds[0])
    return np.array([volts_from_db(-9.0) * birds[0] + edges, birds[1]])


def ring(clicks, hz, t60):
    """A unit click sets a decaying sine of height 1 ringing in a two-pole resonator."""
    r, w = 1000 ** (-1 / (t60 * SR)), 2 * np.pi * hz / SR
    return signal.lfilter([0, np.sin(w)], [1, -2 * r * np.cos(w), r * r], clicks + 1e-18)


def at_ports(sound, pan_db):
    """A sound near the ground reaches the left port later, and at its own level."""
    return np.array([volts_from_db(pan_db) * np.pad(sound, (GROUND_LAG, 0)), np.pad(sound, (0, GROUND_LAG))])


def ticks():
    """Each tick is a burst of tiny contacts into short plastic modes."""
    out, t = np.zeros((2, N)), np.arange(round(0.013 * SR)) / SR
    chance = rng.standard_normal((len(TICKS), len(t)))
    high = signal.butter(3, 1400, "high", fs=SR, output="sos")   # too small to radiate lows
    for (s, level_db, pan_db), noise in zip(TICKS, chance):
        burst = noise * volts_from_db(-60 * t / 0.0051) * np.minimum(t / 0.00035, 1)
        sound = sum(volts_from_db(mode_db) * ring(burst, hz, t60) for hz, mode_db, t60 in TICK_MODES)
        sound = signal.sosfilt(high, sound)
        add(out, s, volts_from_db(level_db + 11.0) * at_ports(sound / np.max(np.abs(sound)), pan_db))
    return out


def case_knocks():
    """A soft blow and a short scuff ring the hollow case; each blow adds a crack as bright as its row says."""
    out, t = np.zeros((2, N)), np.arange(round(.1 * SR)) / SR
    chance = rng.standard_normal((len(KNOCKS), len(t)))
    crack_band = signal.butter(1, [700, 1700], "band", fs=SR, output="sos")
    crack_top = signal.butter(2, 3600, fs=SR, output="sos")
    blow = round(0.00434 * SR)   # the blow falls this many samples in
    for (s, level_db, hz, bright_db, pan_db), noise in zip(KNOCKS, chance):
        contact = volts_from_db(-30.5 - 60 * t / 0.17) * noise
        contact[:blow], contact[blow] = 0, 1
        soft = signal.butter(2, [0.71 * hz, 3.6 * hz], "band", fs=SR, output="sos")
        modes = ring(contact, hz, 0.012) + volts_from_db(-2.0) * ring(contact, 1.8 * hz, 0.009)
        body = signal.sosfilt(soft, modes)
        crack = signal.sosfilt(crack_band, contact * volts_from_db(-60 * t / 0.06))
        crack = signal.sosfilt(crack_top, crack)
        sound = body / np.max(np.abs(body)) + volts_from_db(bright_db + 13.0) * crack / np.max(np.abs(crack))
        add(out, s, volts_from_db(level_db + 2.5) * at_ports(sound, pan_db))
    return out


def twigs():
    """Twigs snap underfoot: a burst of a few milliseconds into one short resonance."""
    out, t = np.zeros((2, N)), np.arange(round(0.016 * SR)) / SR
    chance = rng.standard_normal((len(TWIGS), len(t)))
    for (s, level_db, hz), noise in zip(TWIGS, chance):
        band = signal.butter(2, [0.71 * hz, 1.3 * hz], "band", fs=SR, output="sos")
        snap = signal.sosfilt(band, noise * volts_from_db(-60 * t / 0.063))
        add(out, s, volts_from_db(level_db - 1.0) * at_ports(snap / np.max(np.abs(snap)), pan_db=-22.0))
    return out


def far_whistles():
    """Faint plain whistles from deep in the wood: gliding sines that waver in level."""
    out = np.zeros(N)
    for s, level_db, start_hz, end_hz, ms in FAR_WHISTLES:
        hz = np.linspace(start_hz, end_hz, round(ms * SR / 1000))
        tone = np.sin(2 * np.pi * np.cumsum(hz) / SR)
        waver = 1 + 0.3 * np.sin(2 * np.pi * 24.0 * np.arange(len(hz)) / SR)
        add(out, s, volts_from_db(level_db) * waver * signal.windows.tukey(len(hz), 0.4) * tone)
    return out


def near_bird():
    """Whistles that slide up, level off and sag a little: a sine with a faint octave."""
    out = np.zeros(N)
    for s, level_db, start_hz, top_hz, ms in WHISTLES:
        u = np.linspace(0, 1, round(ms * SR / 1000))
        hz = start_hz + (top_hz - start_hz) * np.sin(np.pi / 2 * np.minimum(u / 0.56, 1.25))
        phase = 2 * np.pi * np.cumsum(hz) / SR
        tone = np.sin(phase) + volts_from_db(-35.0) * np.sin(2 * phase)
        swell = np.sin(np.pi * u ** 0.56) ** 1.2
        add(out, s, volts_from_db(level_db) * swell * tone)
    return out


def dipped(x, hz, width_hz, share):
    """Take out a share of one band by subtracting a resonant filter's output."""
    b, a = signal.iirpeak(hz, hz / width_hz, fs=SR)
    return x - np.clip(share, 0, 1) * signal.lfilter(b, a, x)


def scene():
    """Birds through the trees, over the walker and a blur of far song."""
    birds = sum(woodland(song, lead, early_db=-28, tail_db=-28.5) for song, lead in zip(chorus(), PERCH_LEADS))
    birds = birds + woodland(far_whistles(), PERCH_LEADS[1], early_db=-27, tail_db=-38)
    birds = birds + woodland(near_bird(), PERCH_LEADS[0], early_db=-31.5, tail_db=-36.5)
    soft = walking() + far_song() + shaded(birds) + case_knocks() + twigs()
    top_cut = signal.cheby2(12, 50, TOP_HZ, fs=SR, output="sos")
    return signal.sosfilt(top_cut, soft) + ticks()


def roll_off(x):
    """The treble ends steeply here."""
    return signal.sosfilt(signal.butter(12, 16870, fs=SR, output="sos"), x)


def record(dry):
    """A weak spot in the ports' response, a narrow thin band near 10 kHz and a cut at the top finish the mix."""
    heard = dipped(dry, PORT_DIP_HZ, PORT_DIP_WIDTH_HZ, PORT_DIP_SHARE)
    heard = dipped(heard, THIN_HZ, THIN_WIDTH_HZ, THIN_SHARE)
    heard = signal.sosfilt(signal.cheby2(12, 60, 17300, fs=SR, output="sos"), heard)
    return roll_off(heard)


dry = scene()
out = record(dry)
dump_mix(out)
```